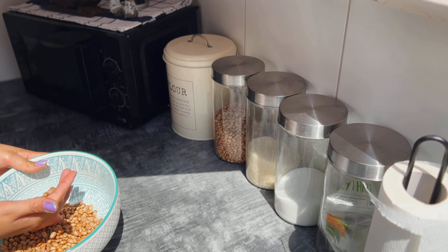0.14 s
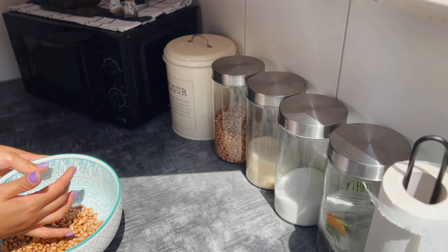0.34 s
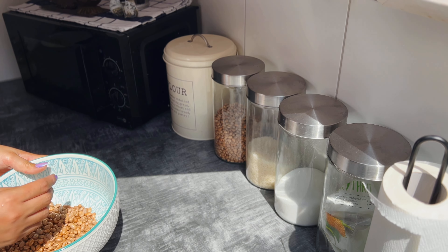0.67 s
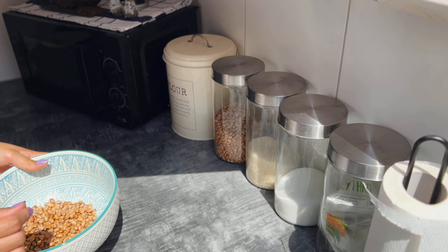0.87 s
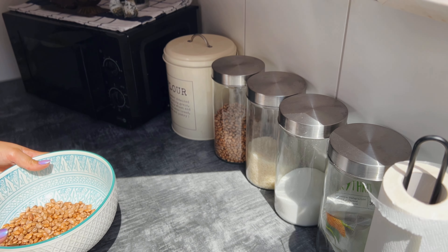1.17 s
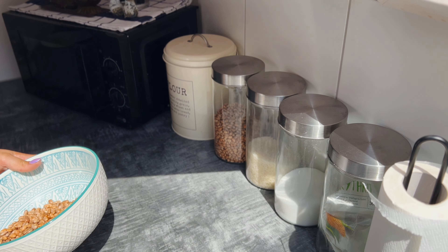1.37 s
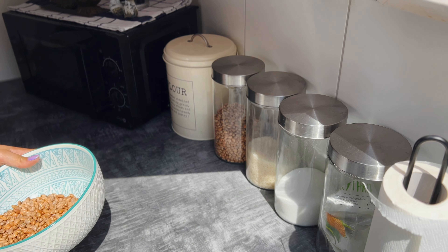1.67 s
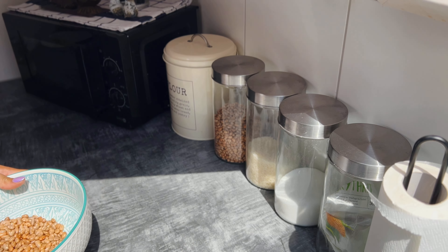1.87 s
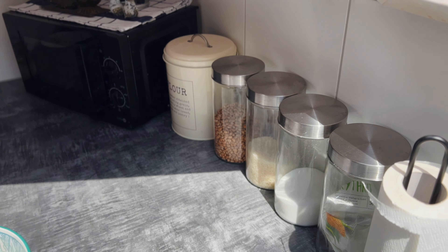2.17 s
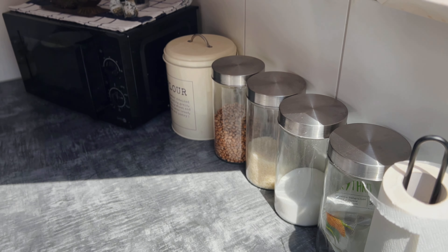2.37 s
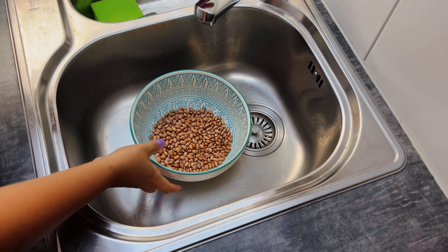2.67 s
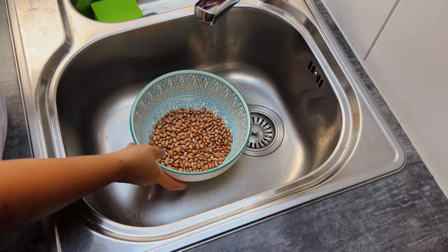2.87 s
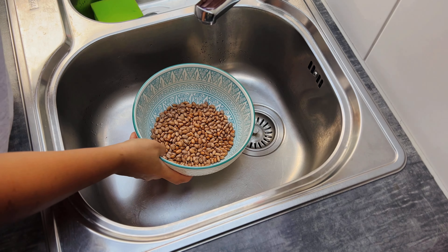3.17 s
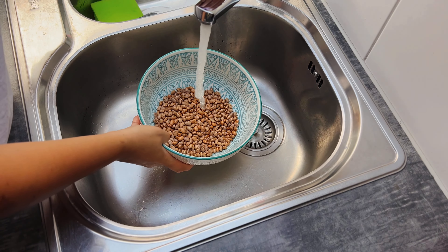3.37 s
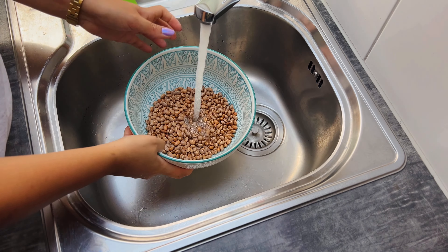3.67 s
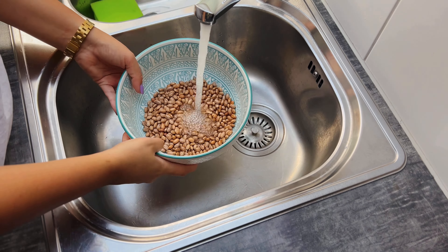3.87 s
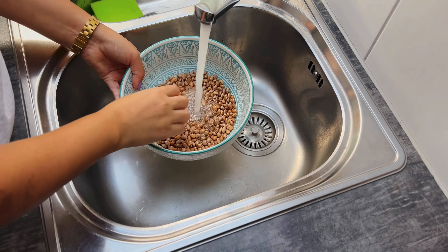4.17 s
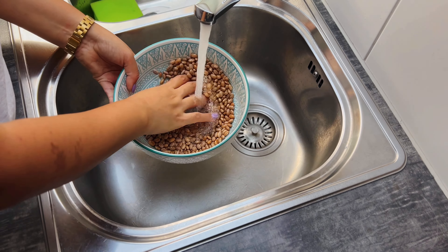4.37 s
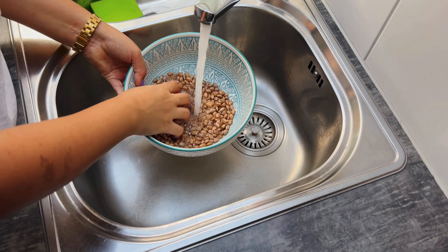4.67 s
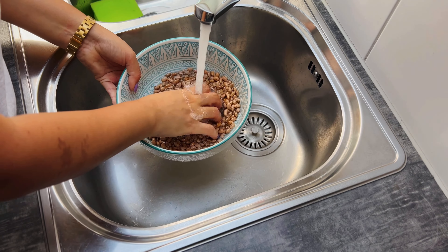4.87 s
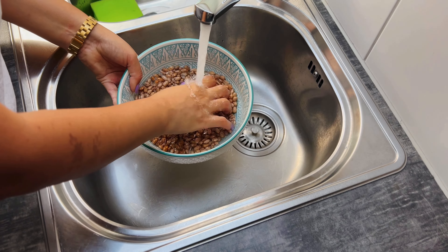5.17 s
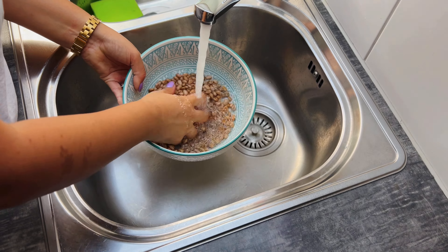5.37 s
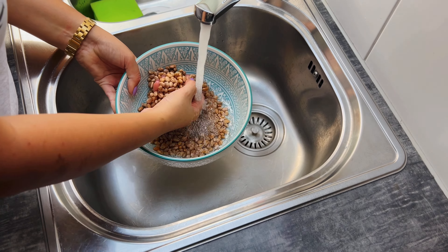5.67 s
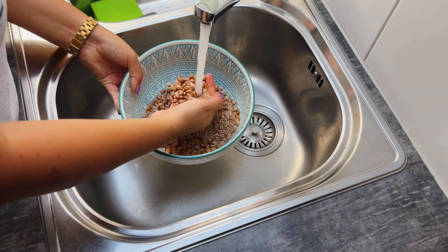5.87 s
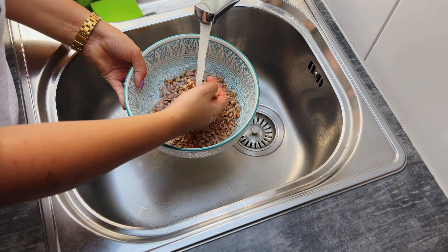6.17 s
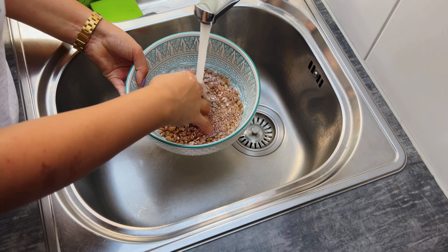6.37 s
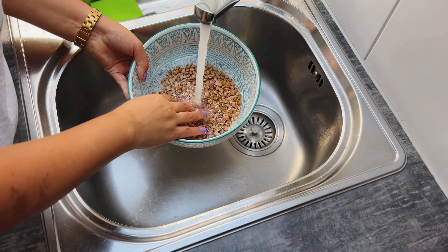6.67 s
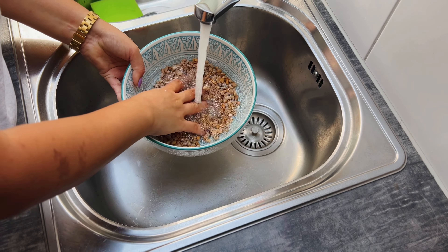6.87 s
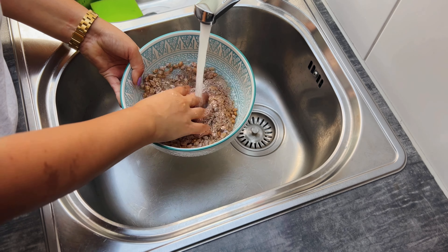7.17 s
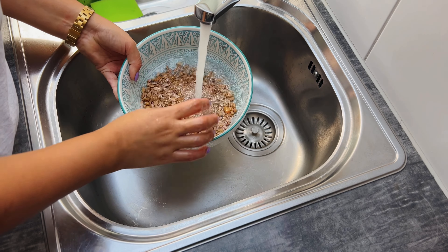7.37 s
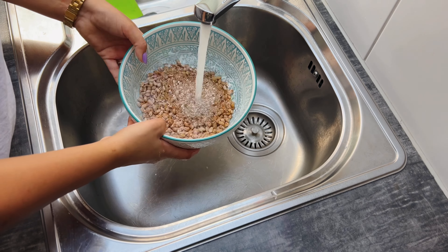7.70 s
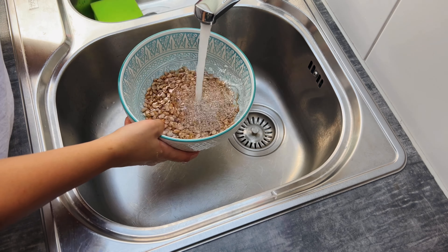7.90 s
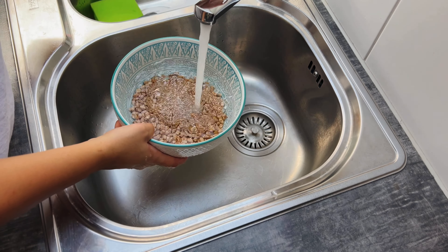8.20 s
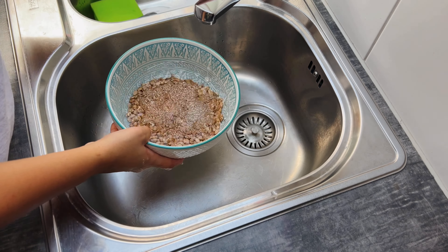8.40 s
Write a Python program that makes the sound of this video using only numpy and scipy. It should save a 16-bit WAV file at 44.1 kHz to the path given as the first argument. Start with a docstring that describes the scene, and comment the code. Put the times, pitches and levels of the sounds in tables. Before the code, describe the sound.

Close, wide stereo pickup with short reflections from tile and steel. A crisp burst of dry beans ticking against ceramic fades to low room tone, with a quieter slide of beans later. Then a metal tap knocks, a sharp hissing jet strikes the beans, and uneven hand strokes make bubbly sloshing and hard wet clacking. Softer gulps follow before a heavy closing thud and last drips.

```python
"""Kitchen counter, then a steel sink: dry beans rustle and slide in a ceramic bowl, then the sink is heard.
The tap handle knocks, the jet hisses and spatters on the beans, a hand stirs them in the rising water, air
gurgles, and the tap is shut with a thump. Beans are clumped clicks and struck bowl modes, the jet coloured
noise, water and wet beans clouds of ringing grains, handle and drops gliding sines; room noise lies under all."""
import sys
import numpy as np
from scipy import signal
from scipy.fft import rfft, irfft, next_fast_len
from scipy.io import wavfile

SR = 44100
rng = np.random.default_rng(int(sys.argv[2]) if len(sys.argv) > 2 else 0)


def unload_wav(signal):
    """Save mono or channel-first audio to the path in sys.argv[1] as 16-bit WAV at rate SR, clipped to [-1, 1]."""
    wavfile.write(
        sys.argv[1],
        SR,
        np.round(np.clip(np.atleast_2d(signal).T, -1, 1) * 32767).astype(np.int16),
    )


def natural_amplitude(level_db):
    """Convert a level in decibels to a linear amplitude factor, elementwise."""
    exponent = np.asarray(level_db, float) / 20
    return 10 ** exponent


N = 376611
TIME = np.arange(N) / SR
FILL_START_S, FILL_END_S = 3.3, 8.25   # the bowl fills evenly


def rms_one(x):
    """Scale to rms 1."""
    return x / np.sqrt(np.mean(x ** 2) + 1e-20)


def in_time(rows):
    """Columns as curves over time; the first, a level, is -120 dB outside its rows."""
    s, level_db, *rest = np.transpose(rows)
    curves = [np.interp(TIME, s, level_db, left=-120, right=-120)]
    return curves + [np.interp(TIME, s, column) for column in rest]


def swells(rows, rise_db_per_s, fall_db_per_s):
    """Each row (start_s, hold_s, ..) rises, holds and falls in straight dB; gives times and one shape a row."""
    t = TIME[::64]
    start_s, hold_s = np.array(rows)[:, [0]], np.maximum(np.array(rows)[:, [1]], 0)
    before_s = np.maximum(start_s - t, 0)
    after_s = np.maximum(t - start_s - hold_s, 0)
    return t, natural_amplitude(-rise_db_per_s * before_s - fall_db_per_s * after_s)


def gains(rows, rise_db_per_s, fall_db_per_s, columns):
    """Swells added in power, one gain curve for each dB column."""
    t, shapes = swells(rows, rise_db_per_s, fall_db_per_s)
    levels = [natural_amplitude(np.array(rows)[:, k]) for k in columns]
    return [np.interp(TIME, t, np.sqrt(level ** 2 @ shapes ** 2)) for level in levels]


def colour(x, points):
    """Filter by a spectrum in rows (freq_hz, level_db), then scale to rms 1."""
    hz, db = np.transpose(points)
    size = next_fast_len(N)
    log_hz = np.log(np.fft.rfftfreq(size, 1 / SR) + 1)
    gain = natural_amplitude(np.interp(log_hz, np.log(hz), db))
    return rms_one(irfft(rfft(x, size) * gain, size)[:N])


def drift(rate_hz):
    """Slow random curve of rms 1: normal draws at rate_hz, joined by lines."""
    count = int(N / SR * rate_hz) + 2
    return rms_one(np.interp(TIME * rate_hz, np.arange(count), rng.standard_normal(count)))


def grains(per_s, spread_db):
    """Random clicks of uneven size and sign."""
    sizes = natural_amplitude(spread_db * np.minimum(rng.exponential(1, N), 5))
    signs = rng.choice([-1, 1], N)
    return sizes * signs * (rng.random(N) < per_s / SR)


def ring(clicks, hz, t60_s):
    """Two-pole mode: a unit click starts a decaying sine of height 1."""
    r, w = natural_amplitude(-60 / (t60_s * SR)), 2 * np.pi * hz / SR
    return signal.lfilter([0, np.sin(w)], [1, -2 * r * np.cos(w), r * r], clicks + 1e-18)


def resonance(x, hz, width_hz):
    """Two-pole bandpass, gain 1 at the centre."""
    r = np.exp(-np.pi * width_hz / SR)
    poles = [1, -2 * r * np.cos(2 * np.pi * hz / SR), r * r]
    return signal.lfilter([(1 - r * r) / 2, 0, (r * r - 1) / 2], poles, x)


def pings(rows, cycles, rise):
    """Rows (time_s, level_db, start_hz): sines falling 50 dB over some cycles as pitch glides, up if rise > 0."""
    out = np.zeros(N + SR)
    for s, db, hz in rows:
        turns = np.arange(int(cycles * SR / hz)) * hz / SR
        soft_start = 1 - np.exp(-turns / 0.95)   # soft contact: it swells first
        shape = natural_amplitude(db - 50 * turns / cycles) * soft_start
        start = round(s * SR)
        out[start:start + len(turns)] += shape * np.sin(2 * np.pi * turns * (1 + rise * turns))
    return out[:N]


def bursts(rows, t60_s, low_hz):
    """Rows (time_s, level_db): short decaying sprays of noise above low_hz."""
    level = np.zeros(N)
    level[np.round(rows[:, 0] * SR).astype(int)] = natural_amplitude(rows[:, 1])
    level = signal.lfilter([1], [1, -natural_amplitude(-60 / (t60_s * SR))], level + 1e-18)
    highpass = signal.butter(2, low_hz, "high", fs=SR, output="sos")
    return level * signal.sosfilt(highpass, rng.standard_normal(N))


def struck(rows, modes):
    """Rows (time_s, level_db, tilt_db_per_octave): each blow excites every mode with its own strength."""
    s, db, tilt_db = np.transpose(rows)
    contact = np.exp(-TIME[:SR // 100] / 0.0011)
    chance_db = rng.normal(0, 1.7, (len(rows), len(modes)))
    out = np.zeros(N)
    for k, (hz, level_db, t60_s) in enumerate(modes):
        clicks = np.zeros(N)
        blow_db = db + level_db + tilt_db * np.log2(hz / 5000) + chance_db[:, k]
        clicks[np.round(s * SR).astype(int)] = natural_amplitude(blow_db)
        skid = rng.standard_normal(len(contact)) * contact   # the contact skids for a moment
        out += ring(signal.oaconvolve(clicks, skid / np.linalg.norm(skid))[:N], hz, t60_s)
    return out


def bubbles(per_s, clump_db, centre_hz, octaves, cycles, count):
    """Clumped grains, each ringing some cycles at a pitch scattered about a centre; rms 1."""
    born = grains(per_s * natural_amplitude(clump_db * drift(40)), 2.06)
    pitches = np.geomspace(np.min(centre_hz) / 2 ** octaves, np.max(centre_hz) * 2 ** octaves, count)
    wanted = np.log(centre_hz) + np.log(2) * octaves / 2 * rng.standard_normal(N)
    dealt = np.searchsorted(np.log(pitches), wanted)
    return rms_one(sum(ring(born * (dealt == k), hz, cycles / hz) for k, hz in enumerate(pitches)))


# room noise spectrum at the counter: freq_hz, level_db (per Hz)
COUNTER_TONE = [(18, -43.5), (30, -12.5), (53, -7.5), (102, -6), (140, -15), (156, -17.5), (213, -21),
                (256, -24), (606, -24.5), (1050, -18.5), (1170, -26.5), (1640, -23), (2300, -38.5),
                (13300, -57), (15500, -66)]
# room noise spectrum at the sink: freq_hz, level_db (per Hz)
SINK_TONE = [(18, -42), (30, -1.5), (132, 3), (163, -11), (207, -8), (445, -6), (828, -9.5), (910, -5.5),
             (1050, -11), (1780, -13), (4290, -27.5), (6760, -27.5), (9000, -48), (11700, -65),
             (19800, -120)]


def room_tone():
    """Steady noise whose colour crossfades where the scene changes from counter to sink."""
    tone_db, change_s = -57.5, (2.17, 2.24)
    air = rng.standard_normal(N)
    at_sink = np.interp(TIME, change_s, [0, 1])
    return natural_amplitude(tone_db) * ((1 - at_sink) * colour(air, COUNTER_TONE) + at_sink * colour(air, SINK_TONE))


# beans shift in the bowl, dropped from the hand, then tipped:
# start_s, hold_s, rattle_db, bowl_ringing_db
SHIFTS = [(0.0, .005, -41, -57.5), (.03, .04, -50, -64), (.08, .01, -43.5, -57), (.105, .05, -34, -49.5),
          (.165, 0.05, -34, -43), (.235, 0.057, -33, -45), (.305, .04, -37, -52), (.36, 0.029, -45.5, -56),
          (.407, 0.0049, -37.5, -52), (.45, .06, -69, -70), (.55, .1, -73, -80), (.74, .11, -80.5, -99),
          (1.33, .01, -78, -95), (1.52, .09, -64, -62.5), (1.64, .03, -56, -57), (1.685, .045, -49, -50),
          (1.79, 0.062, -54, -53), (1.9, 0.033, -68, -66), (1.97, .11, -67.5, -69), (2.13, .25, -68, -84),
          (2.53, .2, -70, -83.5), (2.8, 0.28, -74, -92), (3.11, .005, -74.5, -87), (3.2, .01, -80, -85)]
# single beans striking the bowl wall: time_s, level_db, tilt_db_per_octave, crack_db (against level_db)
BEAN_TICKS = [(0.0273, -44.5, 2.5, -3), (0.0393, -34.5, 7, 8), (0.0837, -35, 10.5, 3),
              (0.1065, -22.5, 13.5, 9.5), (0.123, -23, 7, 7), (0.1624, -22, -2, 0.5),
              (0.183, -22.5, 5.5, 7), (0.2114, -24, 8, 2.5), (0.246, -23.5, 5, 5), (0.2892, -25, 3.5, 7),
              (0.3374, -26.5, -17.5, -5.5), (0.4051, -22.5, -6, 0), (0.4112, -27.5, -13, 2.5),
              (0.5056, -51, -4.5, -4), (1.7044, -38, -6.5, -10), (1.7842, -36.5, 2, 3),
              (1.8374, -41, 3, -8), (1.9778, -43, 4, -2), (2.0026, -36, 9, -3), (2.034, -40, 5, 3.5),
              (2.0532, -39.5, 20, 5.5), (2.0644, -44.5, -12, 4), (2.174, -53, -26, -8),
              (2.1894, -54, 0, -2), (2.3476, -48, -11, 0), (2.5451, -49.5, 2.5, 2)]
# modes of the dry bowl: freq_hz, level_db, t60_s (struck, not damped by beans)
BOWL_MODES = [(2048, -10.5, 0.17), (3540, -3.5, .05), (4050, -5, .04), (4246, 2, 0.065), (4495, -1, .1),
              (5950, 3, 0.045), (6150, -7, 0.066), (6860, -10, .05), (7540, -6.5, 0.1), (7830, -3, 0.074),
              (8260, -19, .05)]
# bean on bean spectrum: freq_hz, level_db (per Hz)
BEAN_COLOUR = [(200, -25.5), (510, -8.5), (820, -10.5), (1000, -17.5), (2000, -19.5), (3000, -19),
               (3600, -6), (4400, -3.5), (7700, -10), (10000, -8), (13300, -5), (15500, -9)]


def dry_beans():
    """Clumped clicks of bean on bean, beans sliding on the wall that ring the bowl, and single strikes."""
    damping = 0.5   # share of the ring time left while beans lie against the wall
    rattle, sliding = gains(SHIFTS, rise_db_per_s=598, fall_db_per_s=400, columns=(2, 3))
    clicks = grains(4000 * natural_amplitude(2.2 * drift(70)), 2.7)
    touches = grains(1500, 3.9)
    offsets = rng.integers(0, N, len(BOWL_MODES))   # each mode feels other touches
    rung = sum(natural_amplitude(db) * ring(np.roll(touches, k), hz, damping * t60_s)
               for k, (hz, db, t60_s) in zip(offsets, BOWL_MODES))
    ticks = np.array(BEAN_TICKS)
    struck_wall = natural_amplitude(-21) * struck(ticks[:, :3], BOWL_MODES)
    crack_rows = ticks[:, [0, 1]] + ticks[:, [3]] * [0, 1]
    crack = bursts(crack_rows, t60_s=0.01, low_hz=6500)
    return rattle * colour(clicks, BEAN_COLOUR) + sliding * rms_one(rung) + struck_wall + crack


# jolts of the tap handle: time_s, thump_db, thump_start_hz, knock_db, knock_start_hz
HANDLE = [(3.036, -17.5, 130, -40, 490), (3.057, -33, 112, -28, 1530), (3.084, -43, 101, -35.5, 1380),
          (3.094, -50, 119, -23.5, 1216), (3.107, -56, 110.3, -27, 1350), (3.127, -42, 101, -29, 1150),
          (3.174, -46, 90, -42.5, 1100), (3.218, -43, 90, -42, 500), (8.205, -27, 58.3, -52, 396),
          (8.274, -22.5, 118, -44, 296.1), (8.291, -17, 181, -43, 610), (8.308, -17.5, 65, -33, 1200),
          (8.336, -20.5, 90, -44, 413), (8.357, -36, 60, -40.5, 412), (8.440, -51, 60, -55.5, 1600)]
# metal parts of the handle tick: time_s, level_db
HANDLE_TICKS = [(3.057, -53.5), (3.084, -52.5), (3.107, -46), (3.126, -61), (3.218, -50.5), (8.205, -60),
                (8.274, -61), (8.308, -37), (8.338, -54), (8.358, -60), (8.44, -38)]
# modes of the metal parts: freq_hz, level_db, t60_s
TICK_MODES = [(3380, -2, 0.022), (4930, 1.5, .018), (5860, -5, .018), (6600, -10.5, .025),
              (7000, -7, 0.041), (7240, -17, 0.016)]


def handle():
    """Jolts: a low thump in the pipe and a short double knock of the valve; metal ticks besides."""
    rows = np.array(HANDLE)
    band = signal.butter(2, [45, 260], "band", fs=SR, output="sos")
    thumps = signal.sosfilt(band, pings(rows[:, [0, 1, 2]], cycles=6.4, rise=-0.017))
    first = rows[:, [0, 3, 4]]
    second = first * [1, 1, .74] + [.002, 0, 0]   # 2 ms later, lower in pitch
    knocks = pings(first, cycles=23, rise=-0.0028) + natural_amplitude(10.0) * pings(second, cycles=3.7, rise=-.002)
    clicks = np.array(HANDLE_TICKS)
    untilted = clicks[:, [0, 1, 1]] * [1, 1, 0]
    ticks = struck(untilted, TICK_MODES) + bursts(clicks, t60_s=.02, low_hz=2494)
    return thumps + knocks + ticks


# water flow, heard as the hiss of the jet: time_s, level_db
FLOW = [(3.17, -80), (3.28, -37.5), (3.39, -40.5), (3.43, -35.5), (3.75, -34.5), (4.1, -37.5), (4.3, -31.5),
        (5.0, -33), (5.7, -31.5), (6.3, -34), (6.55, -35), (6.9, -31.5), (7.4, -35.5), (8.24, -37),
        (8.28, -49.5), (8.43, -53.5), (8.54, -74)]


def jet_flow():
    """Flow as a gain curve, shared by jet and stirred water."""
    return natural_amplitude(in_time(FLOW)[0])


# the pipe shudders as the valve moves: start_s, hold_s, level_db
SHUDDERS = [(3.045, 0.018, -48.5), (8.3, .06, -48), (8.44, .08, -50)]
# the jet breaks on hand or beans and sprays; the last two rows drip after shutting:
# start_s, hold_s, spatter_db, wet_bowl_ringing_db
SPRAYS = [(3.42, 0.063, -32.5, -48), (3.55, .04, -38, -38), (3.67, 0.092, -42, -40),
          (3.95, .01, -43.5, -42), (4.24, 0.087, -32.5, -37.5), (4.39, .02, -35.5, -37.5),
          (4.5, .02, -36, -42.5), (4.6, 0.4, -38, -45), (4.95, .04, -36.5, -44.5), (5.12, 0.0059, -30, -46),
          (5.36, .04, -37, -43), (5.46, 0.045, -33, -45), (5.63, 0.095, -33.5, -47),
          (6.35, 0.0061, -34, -34.5), (6.47, 0.0075, -45, -48), (6.88, 0.037, -36, -52.5),
          (7.15, .05, -40.5, -47), (7.59, .02, -48, -45.5), (7.76, .01, -56, -51.5),
          (7.89, .005, -51.5, -51), (7.94, .01, -49.5, -43.5), (8.1, .1, -47.5, -56),
          (8.3, 0.089, -54.5, -62), (8.43, 0.028, -55, -54)]
# jet spectrum: freq_hz, level_db (per Hz)
JET_COLOUR = [(200, -23), (500, -3), (1200, -1.5), (2500, -7), (5000, -3), (8000, -4), (10000, -2.5),
              (13000, 0), (15500, -0.5)]
# spatter filter: freq_hz, level_db (per Hz)
SPATTER_COLOUR = [(1500, -16), (2600, 2), (3300, 2.5), (4000, -6.5), (4800, 1.5), (5700, -3.5), (7100, 3),
                  (8500, -1.5), (14000, 2.5)]
# loud drops and wet bean clacks: time_s, level_db, start_hz
SPLATS = [(3.2783, -38, 3070), (3.4005, -20.5, 6670), (3.4222, -19, 2720), (3.4777, -19, 3950),
          (3.526, -19.5, 3760), (3.67, -16, 7200), (3.784, -20.5, 4740), (3.81, -24.5, 3960),
          (3.828, -23, 4000), (3.8734, -23, 3780), (3.9018, -24, 7240), (3.9501, -19.5, 3820),
          (3.997, -23.5, 7300), (4.1127, -23.5, 7430), (4.1957, -31.5, 3900), (4.2388, -13.5, 4320),
          (4.315, -11.5, 7680), (4.3564, -36.5, 2824), (4.66, -20.5, 6500), (5.163, -20, 6800),
          (5.2766, -27, 3195), (5.4498, -13.5, 6680), (5.493, -21, 6620), (5.549, -23, 6760),
          (5.602, -20.5, 4770), (5.8055, -19, 2640), (5.864, -28, 2930), (6.4286, -36, 2740),
          (6.6768, -24, 3370), (6.8524, -19.5, 4840), (7.0412, -21, 2782), (7.1053, -23.5, 2780),
          (7.4673, -26.5, 3540), (7.6713, -27.5, 3500), (7.7584, -27, 3620), (7.8888, -24.5, 3580),
          (7.9326, -22.5, 3760), (8.3083, -35.5, 6690), (8.441, -45, 6415)]


def tap():
    """Smooth hiss of the jet, crackle of bursting drops, wet bowl ringing under them, pipe and basin rumble."""
    spatter_under_jet_db, ringing_under_jet_db, spray_hiss_db = -9, -22, -2.5
    pipe_db = -52
    flow = jet_flow()
    spatter, rung = gains(SPRAYS, rise_db_per_s=153, fall_db_per_s=112, columns=(2, 3))
    shudder, = gains(SHUDDERS, rise_db_per_s=900, fall_db_per_s=72, columns=(2,))

    hiss = colour(rng.standard_normal(N) + 0.39 * grains(3000, 2.6), JET_COLOUR) * natural_amplitude(1.39 * drift(45))
    jet = np.hypot(flow, natural_amplitude(spray_hiss_db) * spatter) * hiss

    fizz = bubbles(per_s=2500, clump_db=4.0, centre_hz=5250, octaves=1.44, cycles=24.5, count=18)
    drops = np.hypot(spatter, natural_amplitude(spatter_under_jet_db) * flow) * colour(fizz, SPATTER_COLOUR)

    ringing_hz = np.interp(TIME, [FILL_START_S, FILL_END_S], [4023, 3804])   # water weighs the wall down
    ringing_hz = ringing_hz + 90 * drift(10)
    ringing = bubbles(per_s=380, clump_db=3.5, centre_hz=ringing_hz, octaves=.1, cycles=77.0, count=9)
    wet_bowl = np.hypot(rung, natural_amplitude(ringing_under_jet_db) * flow) * ringing

    rumble_colour = [(25, -45), (45, 0.0), (65, 4.5), (125, 1.0), (220, -6), (500, -46.5)]
    rumble = colour(rng.standard_normal(N), rumble_colour)
    rumbling = TIME > SHUDDERS[0][0]   # from the first shudder to the end
    pipe = np.hypot(shudder, natural_amplitude(pipe_db) * rumbling) * rumble

    splats = natural_amplitude(-3.5) * pings(SPLATS, cycles=67, rise=0.0006)
    splats += natural_amplitude(-4.0) * bursts(np.array(SPLATS), t60_s=0.039, low_hz=3000)
    return jet + drops + wet_bowl + pipe + splats


# the hand sweeps through the beans, or the jet tumbles them: start_s, hold_s, slosh_db, pitch_hz, clack_db
STROKES = [(3.282, .005, -51, 1424, -58), (3.439, .005, -44.5, 1810, -44.5), (3.777, 0.043, -47, 1596, -49),
           (3.55, 0.081, -51, 1450, -60), (3.9, .1, -51, 1505, -55), (4.251, .07, -34.5, 1317, -42.5),
           (4.368, 0.16, -29.5, 1714, -34.5), (4.599, 0.032, -33, 1415, -36.5),
           (4.746, 0.054, -33.5, 1532, -35.5), (4.859, 0.11, -30, 1510, -35.5),
           (5.02, .05, -37.5, 1502, -36), (5.115, .01, -29.5, 1266, -34), (5.222, .07, -35, 1604, -37.5),
           (5.299, 0.091, -35, 1252, -40), (5.473, .01, -36.5, 1686, -37), (5.55, .08, -40.5, 1496, -41),
           (5.68, .05, -37.5, 1428, -42.5), (5.805, 0.027, -40.5, 1647, -46),
           (5.9, 0.095, -43.5, 1630, -47.5), (6.06, 0.013, -45, 1255, -44),
           (6.311, 0.018, -34, 1146, -33.5), (6.364, .005, -27, 1412, -30.5),
           (6.448, .005, -34, 1417, -36.5), (6.685, .005, -39, 1437, -39), (6.797, .06, -32, 1466, -40),
           (6.934, .06, -37, 1333, -43.5), (7.073, .005, -28, 1162, -31), (7.137, 0.025, -33, 1554, -39),
           (7.25, .03, -44.5, 1330, -45), (8.308, 0.0041, -43.5, 1540, -51.5),
           (8.41, 0.094, -52.5, 1598, -60.5)]
# resonances of sink and wet bowl under the stirring: freq_hz, width_hz, level_db
WET_BOWL = [(1102, 430, -1.5), (1630, 60, 0.5), (1960, 330, -4), (2890, 83, 3.5), (4120, 58, -21.5),
            (4660, 130, -4)]


def stirring():
    """Slosh of bubbles around a moving pitch and wet beans clacking higher up, through sink and bowl."""
    slosh_under_jet_db, clack_under_jet_db, calm_hz = -12, -15.5, 1400
    flow = jet_flow()
    rise_db_per_s, fall_db_per_s = 329, 199
    swept, knocked = gains(STROKES, rise_db_per_s, fall_db_per_s, columns=(2, 4))
    calm = natural_amplitude(slosh_under_jet_db) * flow   # what the jet alone stirs up

    t, shapes = swells(STROKES, rise_db_per_s, fall_db_per_s)
    strokes = np.array(STROKES)
    powers = (natural_amplitude(strokes[:, [2]]) * shapes) ** 2   # stronger strokes pull the pitch more
    pull_hz = np.interp(TIME, t, (strokes[:, 3] - calm_hz) @ powers) / (swept ** 2 + calm ** 2)
    slosh_hz = np.clip(calm_hz + pull_hz, 1100, 1850)

    slosh = bubbles(per_s=900, clump_db=3.0, centre_hz=slosh_hz, octaves=.58, cycles=33.0, count=22)
    clack = bubbles(per_s=700, clump_db=3.0, centre_hz=2450, octaves=0.42, cycles=62.0, count=12)
    stirred = np.hypot(swept, calm) * slosh
    stirred += np.hypot(knocked, natural_amplitude(clack_under_jet_db) * flow) * clack
    stirred += sum(natural_amplitude(db - 3.0) * resonance(stirred, hz, width_hz) for hz, width_hz, db in WET_BOWL)
    # the stirring keeps to the range above 930 Hz; deeper bubbles are in gurgling()
    return signal.sosfilt(signal.butter(3, 930, "high", fs=SR, output="sos"), stirred)


# air among the beans: time_s, gurgle_db, pitch_hz
AMONG = [(3.36, -66, 704), (3.43, -54.5, 682), (3.53, -45, 691), (3.9, -43, 606), (4.15, -45.5, 640),
         (4.3, -37.5, 578.3), (4.47, -51, 650), (4.62, -40, 619), (4.9, -42.5, 663), (5.12, -40, 698),
         (5.2, -54, 702.7), (5.36, -44.5, 600), (5.8, -61, 646), (6.4, -45, 646), (6.55, -57.5, 640),
         (7.1, -42, 600), (7.3, -55, 600), (8.25, -62, 620), (8.32, -41, 644), (8.4, -67, 644)]
# the air pocket under the jet gulps: start_s, hold_s, level_db
GULPS = [(4.23, .02, -49.5), (5.33, .01, -51.5), (5.62, .05, -54), (6.62, .04, -45), (6.76, .03, -49.5),
         (6.92, .005, -47.5), (7.39, .03, -47.5), (7.58, 0.026, -49.5), (7.665, .01, -45.5),
         (7.91, .02, -47.5), (8.18, .01, -57), (8.3, .01, -40)]
# large bubbles in the slosh: time_s, level_db, start_hz
BUBBLES = [(3.42, -24.5, 1770), (3.524, -32.5, 660), (3.591, -36.5, 717), (3.665, -37.5, 675),
           (3.777, -34.5, 614), (3.824, -17.5, 2310), (3.869, -37, 547), (3.949, -31.5, 1440),
           (4.22, -28, 1260), (4.24, -23, 1300), (4.288, -19, 1270), (4.461, -19, 1630),
           (4.494, -22.5, 1950), (4.835, -17, 1880), (5.045, -24, 1600), (5.076, -17, 1610),
           (5.104, -17, 1550), (5.111, -13.5, 1260), (5.118, -22.5, 758), (5.249, -23, 1750),
           (5.36, -21, 1195), (5.45, -26, 2170), (5.631, -26, 1000), (5.676, -26.5, 1500),
           (5.711, -22, 1400), (5.832, -20.5, 1920), (5.918, -21.5, 2450), (5.955, -23, 1820),
           (6.012, -32, 1226), (6.25, -26.5, 1020), (6.291, -20.5, 1110), (6.329, -29.5, 1128),
           (6.349, -15, 1610), (6.422, -28, 1220), (6.679, -32, 1314), (6.812, -18, 1660),
           (6.836, -17, 1243), (7.025, -16.5, 1160), (7.052, -17, 1077), (7.205, -34.5, 1064),
           (7.253, -32, 1266), (7.284, -31, 1420), (7.672, -35, 1530), (7.837, -30, 1200),
           (8.292, -31.5, 863), (8.308, -33, 775), (8.423, -28.5, 1660)]


def gurgling():
    """Air among the beans and in a pocket under the jet rings as clouds of grains; large bubbles chirp up."""
    stroke_gurgle_db = -14.5   # each stroke frees more air, against its slosh
    swept, = gains(STROKES, rise_db_per_s=329, fall_db_per_s=199, columns=(2,))
    among_db, among_hz = in_time(AMONG)
    among = bubbles(per_s=700, clump_db=1.5, centre_hz=among_hz, octaves=.07, cycles=34.0, count=12)
    gurgle = np.hypot(natural_amplitude(among_db), natural_amplitude(stroke_gurgle_db) * swept) * among

    gulp, = gains(GULPS, rise_db_per_s=153.5, fall_db_per_s=99, columns=(2,))
    filling = (TIME > FILL_START_S) * (TIME < FILL_END_S)
    pocket = natural_amplitude(np.interp(TIME, [6.45, 6.6], [-58.5, -52])) * filling   # louder once the water is deep
    pool = bubbles(per_s=600, clump_db=1.0, centre_hz=314.3, octaves=0.23, cycles=12.7, count=6)
    return gurgle + np.hypot(pocket, gulp) * pool + pings(BUBBLES, cycles=44, rise=0.0015)


def kitchen(x):
    """Reflections of tiles and steel: unit-energy noise that dies away after a 3 ms gap."""
    t60_s = 0.42
    t = np.arange(int(t60_s * SR)) / SR
    tail = rng.standard_normal(len(t)) * natural_amplitude(-60 * t / t60_s) * (t > .003)
    return signal.fftconvolve(x, tail / np.sqrt(np.sum(tail ** 2)))[:N]


# stereo widening: freq_hz, width_angle_rad, side_in_phase, side_in_quadrature (both against mid)
WIDENING = [(60, 0.098, -0.56, 1), (260, .26, -0.1, 0.91), (600, 0.62, -0.5, 0.3), (714, 0.75, -0.36, -1.7),
            (922, 0.66, 0.83, 0), (1040, 0.65, 0.25, -0.063), (1390, 0.66, -0.25, 1),
            (1690, 0.72, 0.063, 0.85), (2592, 0.61, 0.099, 1), (2930, 0.88, 0.12, 1),
            (3800, 0.68, 0.41, -0.22), (4580, 0.45, 0.39, -.18), (5340, .7, 0.49, -0.0028),
            (6600, 0.41, 0.3, .1)]


def widen(x):
    """Stereo widening: mid and side made from one mono wave, the side partly turned in phase, partly diffuse."""
    in_step_hz, turn_hz, treble_likeness = 6903, 5980, .72
    scatter_s, drifts_per_s = .02, 40
    size = next_fast_len(N + SR)
    hz = np.fft.rfftfreq(size, 1 / SR)
    at_hz, angle, in_phase, quadrature = np.transpose(WIDENING)
    low = hz < in_step_hz
    turn = np.pi * (hz - in_step_hz) / turn_hz   # the treble angle turns on with frequency
    angle = np.where(low, np.interp(hz, at_hz, angle), turn)
    alike = np.where(low, np.interp(hz, at_hz, in_phase + 1j * quadrature), -1j * treble_likeness)

    # two scattering paths of even colour; their blend drifts at random, so the side sound stays diffuse
    t = TIME[:SR // 20]
    paths = rfft(rng.standard_normal((2, len(t))) * natural_amplitude(-60 * t / scatter_s), size)
    wave = rfft(x, size)
    first, second = irfft(wave * paths / abs(paths), size)[:, :N]
    blend = np.pi * drift(drifts_per_s)
    scattered = rfft(np.cos(blend) * first + np.sin(blend) * second, size)

    mid = wave * np.cos(angle)
    unlike = np.sqrt(np.clip(1 - abs(alike) ** 2, 0, 1))
    side = np.sin(angle) * (alike * wave + unlike * scattered)
    return irfft(np.array([mid + side, mid - side]), size)[:, :N]


def scene():
    """Counter scene, then sink scene: all sources, their reflections and the room tone, widened to stereo."""
    near = dry_beans() + handle() + tap() + stirring() + gurgling()
    reflections = natural_amplitude(-9) * kitchen(near)
    return widen(near + reflections + room_tone())


def roll_off(x):
    """The treble ends steeply here."""
    return signal.sosfilt(signal.butter(12, 16470, fs=SR, output="sos"), x)


def record(dry):
    """Steep lowpass at 16.4 kHz finishes the mix."""
    lowpass = signal.cheby2(10, 60, 16400, fs=SR, output="sos")
    mix = signal.sosfilt(lowpass, dry)
    return roll_off(mix)


dry = scene()
out = record(dry)
unload_wav(out)
```